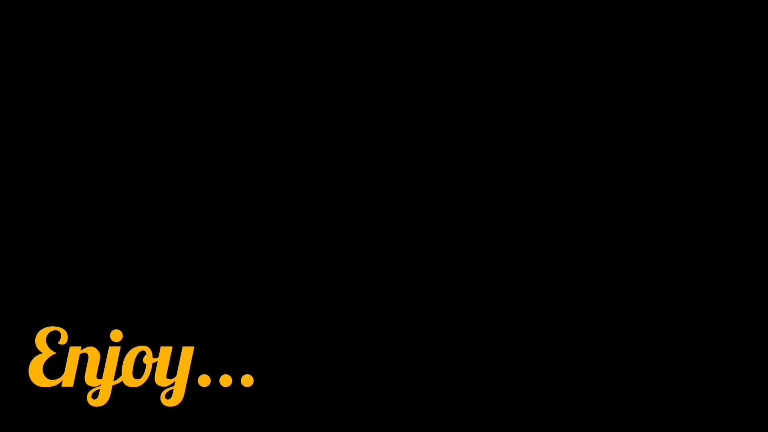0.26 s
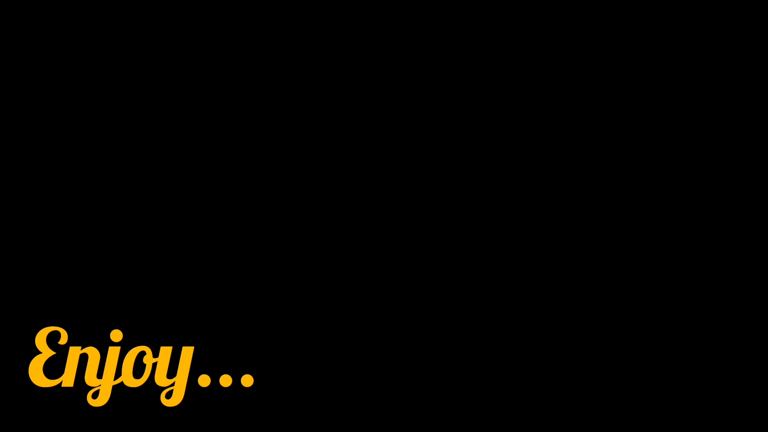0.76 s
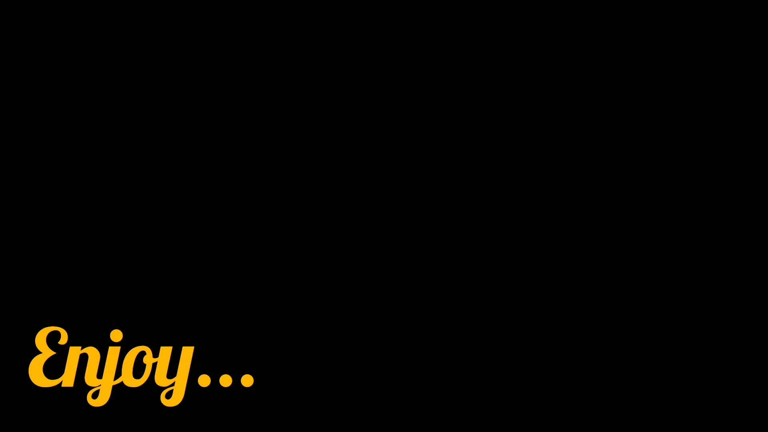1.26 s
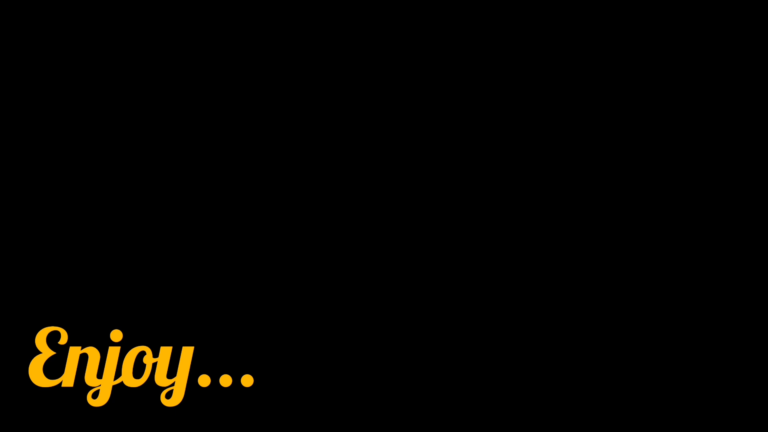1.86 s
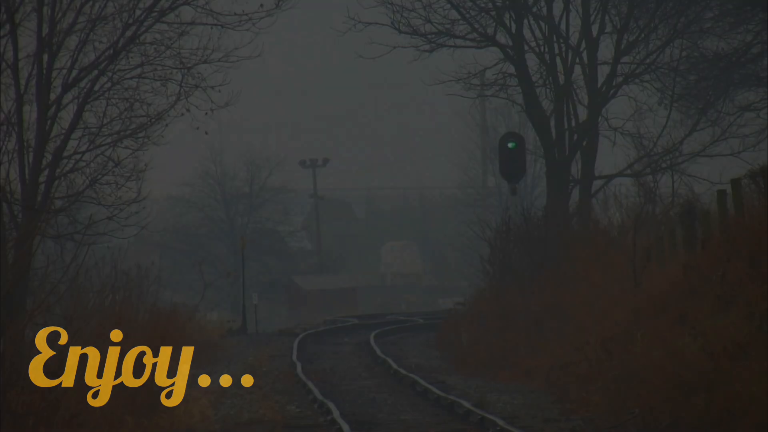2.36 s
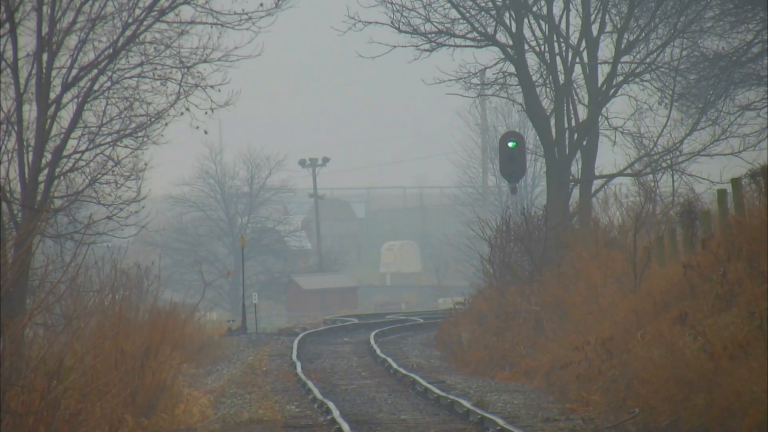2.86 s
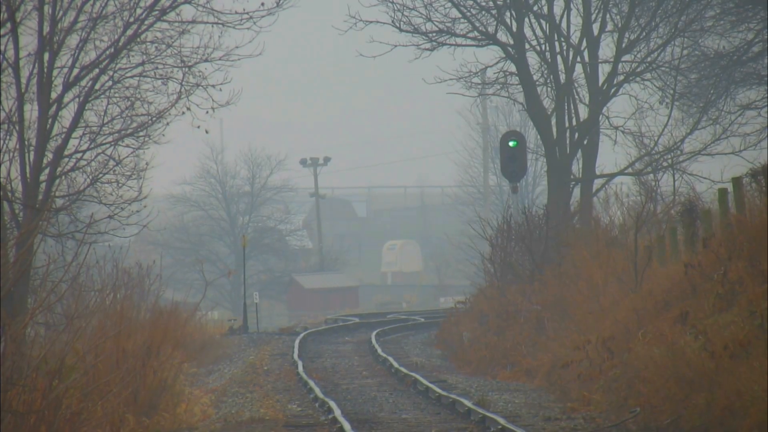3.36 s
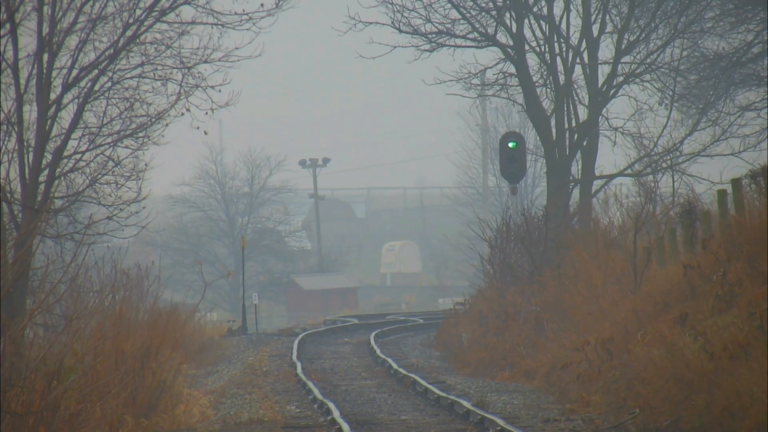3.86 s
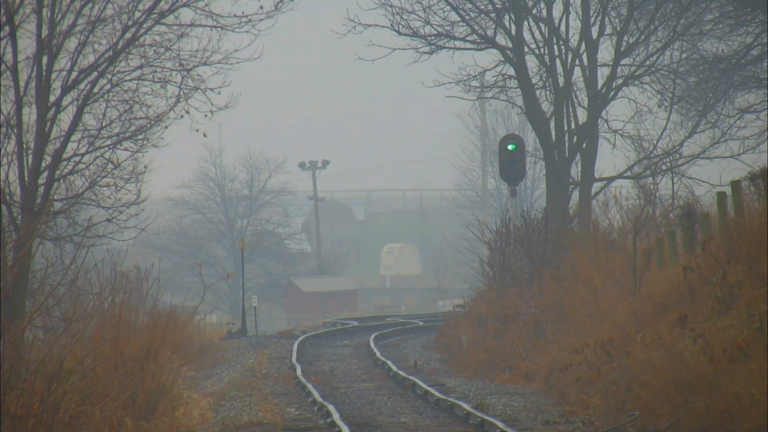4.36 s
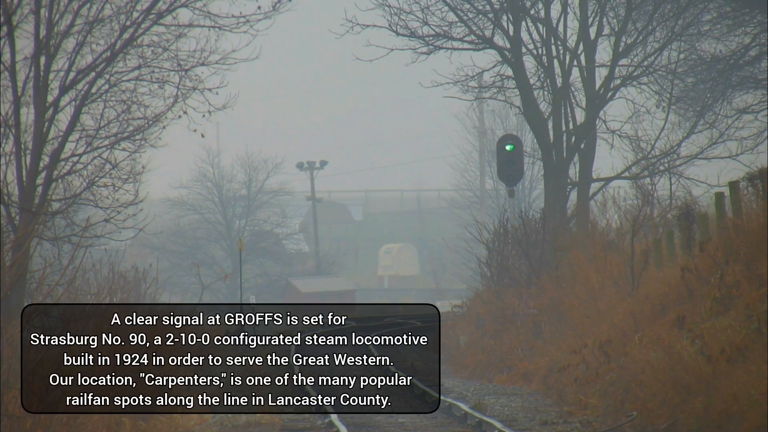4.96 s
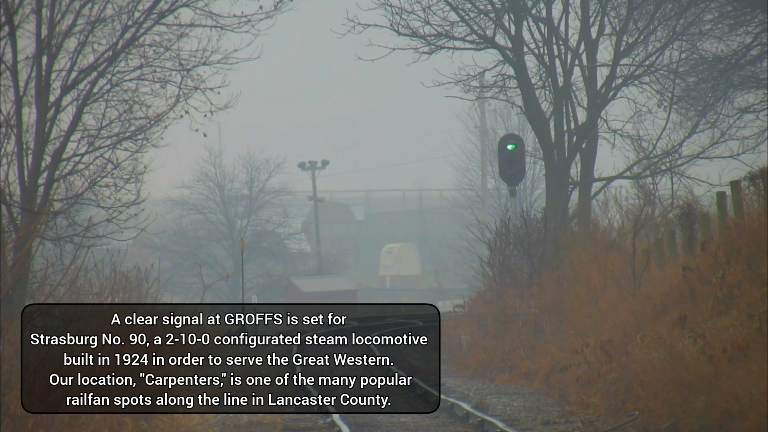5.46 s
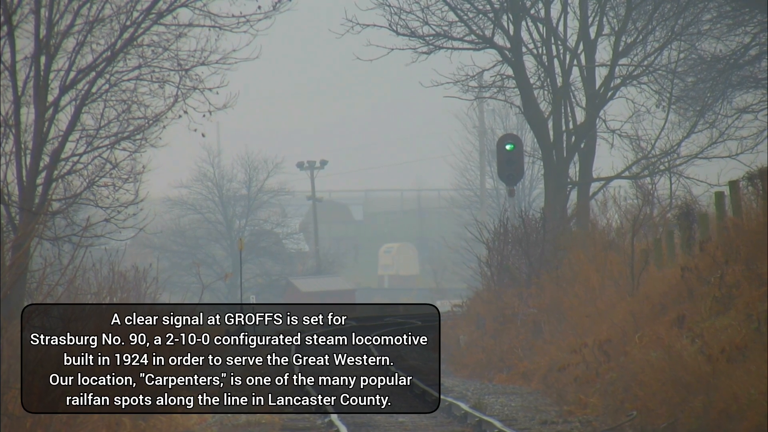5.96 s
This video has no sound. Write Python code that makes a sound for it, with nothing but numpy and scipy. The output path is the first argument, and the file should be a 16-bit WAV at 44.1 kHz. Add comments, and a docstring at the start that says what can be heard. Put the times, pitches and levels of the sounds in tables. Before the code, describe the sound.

From the start, a diesel engine hums steadily close by and slightly to the left, holding one pitch over a rush of fan and mechanical noise. Two small sharp ticks come at about 0.7 and 1.2 seconds. From around 2 seconds the engine fades, and by 3 seconds it has given way to a much quieter outdoor lane. Far traffic makes a soft rush, with a faint whine that swells near 3.5 seconds, returns more weakly near 5 and sinks in pitch. Tyre hiss rises briefly on the left at about 5 seconds. Light wind buffets the microphone, with low bumps between 3.5 and 5.7 seconds. Small birds twitter faintly from 3 seconds on, echoing slightly among the trees, with sharper high calls near 3.4 and 4.8 seconds and one thin whistle at about 6 seconds.

```python
"""Diesel engine and quiet lane

A six-cylinder diesel hums steadily close by on the left, with a tick or two: harmonics of its firing
cycle over fan and block noise. It fades out as a quiet lane fades in: far traffic with a sinking
whine, light wind buffeting the microphones, and small birds whose whistles echo among bare trees."""
import sys
import numpy as np
from scipy import signal
from scipy.fft import rfft, irfft, next_fast_len
from scipy.io import wavfile
from scipy.ndimage import uniform_filter1d, map_coordinates

SR = 44100
rng = np.random.default_rng(int(sys.argv[2]) if len(sys.argv) > 2 else 0)


def file_out(sig):
    """Save sig as 16-bit WAV at sys.argv[1]."""
    # one column per channel
    cols = np.atleast_2d(sig).T
    # limit, then scale
    lim = np.clip(cols, -1, 1)
    pcm = np.round(lim * 32767).astype(np.int16)
    wavfile.write(sys.argv[1], SR, pcm)


N = 274302
TIME = np.arange(N) / SR

# Levels are relative. Firing rate of the engine: t/s, f/Hz
FIRING_RATE = [(0.1, 106.8), (2.5, 106)]
# Exhaust harmonics: multiple of the six-firing cycle, level/dB
EXHAUST_ORDERS = [(2, -54), (3, -46), (4, -46.5), (5, -47), (6, -24), (7, -40), (8, -39), (9, -52),
                  (10, -49), (11, -56.5), (12, -44.5), (13, -67), (14, -72)]
# Panel resonances of the casing: f/Hz, width/Hz, level/dB re the roar
PANEL_MODES = [(1302, 57, 3), (1577, 74, 5), (5000, 330, -21), (5960, 150, -3.5)]
# Noise spectral densities: f/Hz, level/dB
ROAR_SPECTRUM = [(20, -28), (40, 0), (75, 1.5), (130, 0), (190, -3), (260, -5.5), (340, -10), (520, -10.5),
                 (950, -10), (1150, -16.5), (2000, -16.5), (2600, -19.5), (5000, -25), (7000, -29),
                 (11000, -33), (15700, -45)]
ROAD_SPECTRUM = [(150, -37), (250, -13.5), (282, -7.5), (353, -2.5), (508, -7), (614, -1.5), (1010, -4),
                 (1250, -4.5), (1890, -15), (2450, -17), (7660, -27.5), (12700, -32), (15600, -39)]
TYRE_SPECTRUM = [(500, -42), (900, -1), (1300, 3.5), (1800, -5.5), (2500, -12), (4000, -34.5)]
WIND_SPECTRUM = [(12, -28), (20, -0.5), (65, -2.5), (177, -3), (235, -7), (280, -23), (330, -10.5),
                 (430, -45.5), (730, -120)]
# Stereo images: f/Hz, coherence, left minus right level/dB, left phase lead/rad
ENGINE_IMAGE = [(30, .95, -1, 0.22), (100, 1, -1.5, 0.5), (250, 0.96, 0.5, 0.92), (514, 0.95, 4.5, 1.33),
                (950, 0.8, 4.5, 1.69), (1980, 0.66, 5, 3.07), (2980, 0.82, 5, 4.15), (4570, 0.12, 10, 6.2),
                (6060, 0.42, 10, 8.8), (8300, 1, 7, 10.7), (11200, 0.47, 8.5, 10.66),
                (15000, 0.61, 10.5, 14)]
ROAD_IMAGE = [(250, 0.15, 2, 0), (504, 0.13, -1, 1), (990, 0.6, 3, 2.5), (1250, 0.86, 3, 2),
              (1620, 0.6, 6, 3), (2000, 0.34, 0.5, 3), (3000, 0.08, 0.5, 5), (15000, 0.058, -1.5, 5)]
WIND_IMAGE = [(30, 0.14, 0, 0), (90, 0.0016, 1.2, 0.027), (166, 0.51, 0, 0.0088), (255, 0.26, 0, 0)]
TYRE_IMAGE = [(1000, 0.68, 10.0, 2.44), (2500, 0.5, 6.7, 3.35)]
# Ticks: t/s, level/dB, low f/Hz, high f/Hz, T60/s, body level/dB, left minus right level/dB
TICK_EVENTS = [(.664, -25.5, 4600, 6800, .008, -20, 5.5), (1.1712, -15, 4000, 11000, .005, -2, -4),
               (5.115, -55, 1500, 2500, .02, 0, 5), (5.217, -54, 7000, 14000, .006, -30, 6)]
# Modes of a tick's body: f/Hz, level/dB, T60/s
TICK_MODES = [(1600, 1, .02), (2900, 1, .006), (4000, 3, .005), (5000, 2, .005)]
# Far vehicles swelling the tyre hiss: centre t/s, half length/s, rise/dB
VEHICLE_PASSES = [(3.58, .15, 1), (5.08, .3, 6.5)]
# Fundamental of the drive whine: t/s, f/Hz
WHINE_GLIDE = [(2.6, 320), (4.05, 316), (6.22, 294.5)]
# Its harmonics: multiple, level/dB
WHINE_HARMONICS = [(2, 4.5), (3, 2), (4, -4)]
# Plateaus of its swells: start t/s, end t/s, level/dB
WHINE_PLATEAUS = [(3.4, 4.03, -56.5), (4.8, 5.0, -63)]
# Strong gust bumps: centre t/s, level/dB, f/Hz
GUST_BUMPS = [(3.547, -21, 97), (3.768, -21, 102), (4.538, -23, 70), (4.745, -22, 74.6), (4.832, -21, 113),
              (4.931, -24, 86), (4.973, -24.5, 80), (5.452, -24, 75), (5.479, -24, 64.7),
              (5.525, -18.5, 131)]
# Short twittered slurs: t/s, length/s, start f/Hz, end f/Hz
TWITTER_SLURS = [(3.008, .016, 4200, 3400), (3.058, .02, 3350, 3050), (3.086, .034, 3050, 3750),
                 (3.12, .016, 3500, 3150), (3.602, .016, 4200, 3700), (3.646, .012, 3700, 4100),
                 (3.674, .022, 4000, 3200), (3.696, .012, 3400, 3800), (3.743, .02, 3300, 3000),
                 (4.058, .018, 4100, 3600), (4.117, .018, 3550, 3950), (4.135, .012, 3500, 3100),
                 (4.657, .02, 3200, 3500), (4.908, .016, 3300, 3550), (5.01, .016, 3300, 3550),
                 (5.368, .026, 3100, 3950), (5.394, .016, 3550, 3200)]
# Falling chirps: t/s, start f/Hz, middle level/dB
FALLING_CHIRPS = [(4.135, 7900, -68), (4.24, 7650, -66)]
# Sharp up-and-down calls: t/s, top f/Hz, level/dB
ARCHED_CALLS = [(3.426, 7600, -51), (4.826, 7850, -52.5)]

ENGINE_GAIN_DB, HUM_DROP_S, HUM_DROP_DB = 1.5, (2.75, 2.8), -4.5
FADE_START_S, ENGINE_GONE_S, LANE_FULL_S = 1.904, 2.93, 2.96
ROAD_DB, HISS_DB, BREEZE_DB = -49, -55.5, -43.5
WHINE_FLOOR_DB, WHINE_RISE_DB_PER_S, WHINE_FALL_DB_PER_S = -70, 23, 72
SMALL_BUMPS_S, SMALL_BUMP_DB, SMALL_BUMP_HZ = (4.3, 5.65), -29.5, 78
ARCH_S, ARCH_FOOT_HZ = .037, 4300
BAND_LIMIT_HZ = 15725


def engine():
    """Periodic excitation: exhaust and valves share one cycle of six firings."""
    firing_hz = curve(FIRING_RATE) + .3 * wobble(4)
    cycle = 2 * np.pi * np.cumsum(firing_hz) / 6 / SR
    hum_gain = amp(np.interp(TIME, HUM_DROP_S, [0, HUM_DROP_DB]))  # the hum steps down late in the fade
    return hum_gain * exhaust(cycle) + block_noise(cycle)


def exhaust(cycle):
    """Fourier series: uneven cylinders give lines at multiples of a sixth of the firing rate."""
    note = np.zeros(N)
    for order, db in EXHAUST_ORDERS:
        drift = .5 if order % 6 == 0 else 2.5  # the unevenness of the burns varies between cycles
        lag = .05 * (order - 6) ** 2  # the pipe smears each pulse in time
        peak = np.sqrt(2) * amp(db + drift * wobble(4.53))
        note += peak * np.cos(order * cycle - lag + 0.6 * drift * wobble(4.1))
    return filtered(note, placed(ENGINE_IMAGE))


def block_noise(cycle):
    """Resonance and modulation: panels colour the fan and block roar; valve clatter pulses its treble."""
    panels = lambda hz: 1 + sum(amp(db) / (1 + (2 * (hz - centre) / width) ** 2)
                                for centre, width, db in PANEL_MODES)
    roar = rush(ROAR_SPECTRUM, ENGINE_IMAGE, patchy_db=0.9, colour=panels)
    treble = filtered(roar, lambda hz: 1 / (1 + (7000 / (hz + 1)) ** 4))
    valve = lambda lag: np.exp(4.3 * (np.cos(cycle - lag) - 1))  # a brief burst once a cycle
    clatter = 0.7 * amp(2.2 * wobble(12)) * valve(4.4) + 0.25 * amp(2.6 * wobble(12)) * valve(7.3)
    clatter += 0.097 * wobble(29.6) - .2
    return amp(-31.5) * (roar + treble * clatter)


def ticks():
    """Damped transients: a crack of band noise, and body modes that build up within a millisecond."""
    out, t = np.zeros((2, N)), np.arange(SR // 20) / SR
    for s, db, low_hz, high_hz, t60, body_db, pan_db in TICK_EVENTS:
        band = signal.butter(2, [low_hz, high_hz], "band", fs=SR)
        crack = amp(-60 * t / t60) * unit(signal.lfilter(*band, rng.standard_normal((2, len(t)))))
        modes = sum(amp(body_db + level + rng.normal(0, 2) - 60 * t / ring) * np.sin(2 * np.pi * hz * t)
                    for hz, level, ring in TICK_MODES)
        body = (1 - np.exp(-t / .0004)) * modes
        add(out, s, amp(db) * (crack + body) * sides(pan_db)[:, None])
    return out


def drive_whine():
    """Harmonics on a gliding fundamental: a far drive swells twice and sinks in pitch as it recedes."""
    swells = [db - WHINE_RISE_DB_PER_S * np.maximum(start - TIME, 0)
              - WHINE_FALL_DB_PER_S * np.maximum(TIME - end, 0) for start, end, db in WHINE_PLATEAUS]
    level = np.maximum(np.max(swells, axis=0), WHINE_FLOOR_DB)
    phase = 2 * np.pi * np.cumsum(curve(WHINE_GLIDE) + 2.58 * wobble(15)) / SR
    whine = sum(amp(level + db + 2.4 * wobble(7.7)) * np.sin(k * phase) for k, db in WHINE_HARMONICS)
    return filtered(whine, placed(ROAD_IMAGE))


def traffic():
    """Broadband rolling noise: a far road's rush, and tyre hiss on the left that swells at each pass."""
    road = amp(ROAD_DB + 0.17 * wobble(3.68)) * rush(ROAD_SPECTRUM, ROAD_IMAGE, patchy_db=1.03)
    rise_db = sum(db * np.exp(-((TIME - s) / half) ** 2) for s, half, db in VEHICLE_PASSES)
    return road + amp(HISS_DB + rise_db) * rush(TYRE_SPECTRUM, TYRE_IMAGE, patchy_db=1.5)


def wind():
    """Pressure fluctuations: low buffeting, and bumps that push the left capsule and pull the right."""
    lumps = amp(1.6 * np.array([wobble(11), wobble(5.9)]))
    out = amp(BREEZE_DB) * unit(lumps * rush(WIND_SPECTRUM, WIND_IMAGE, patchy_db=-0.3))
    first, last = SMALL_BUMPS_S
    small = [(first + (last - first) * when, SMALL_BUMP_DB + 6 * (force - .5),
              SMALL_BUMP_HZ * 2 ** (pitch - .5)) for when, force, pitch in rng.random((11, 3))]
    for s, db, hz in GUST_BUMPS + small:
        half = int(1.5 * SR / hz)
        periods = np.arange(-half, half) * hz / SR
        pulse = np.cos(2 * np.pi * periods + rng.uniform(0, 2 * np.pi)) * np.exp(-(periods / 0.5) ** 2)
        add(out, s - half / SR, amp(db) * pulse * [[1], [-.48]])
    return out


def bird_slurs():
    """Frequency modulation: each whistled note is a linear glide with a slight quaver."""
    out, quaver = np.zeros((2, N)), 1 + .012 * wobble(90)

    def slur(s, length_s, start_hz, end_hz, db, pan_db=0, swell_db=0):
        u = np.linspace(-1, 1, int(length_s * SR))
        hz = np.linspace(start_hz, end_hz, len(u)) * quaver[round(s * SR):][:len(u)]
        envelope = amp(db + swell_db * u / 2) * (1 - u ** 2) ** .4
        add(out, s, envelope * np.sin(2 * np.pi * np.cumsum(hz) / SR) * sides(pan_db)[:, None])

    for row in TWITTER_SLURS:
        slur(*row, db=-63, pan_db=3)
    for s, hz, db in FALLING_CHIRPS:
        slur(s, length_s=.056, start_hz=hz, end_hz=hz - 1850, db=db, swell_db=8)
    slur(5.88, length_s=.255, start_hz=5520, end_hz=5150, db=-72)  # one long, thin note
    return out


def bird_arches():
    """Period doubling: a call rises and falls in pitch, with a subharmonic at full breath."""
    out, u = np.zeros((2, N)), np.linspace(-1, 1, int(ARCH_S * SR))
    for s, top_hz, db in ARCHED_CALLS:
        phase = 2 * np.pi * np.cumsum(top_hz + (ARCH_FOOT_HZ - top_hz) * abs(u) ** 3.2) / SR
        subharmonic = amp(-8) * (1 - u ** 2) ** 3 * np.sin(phase / 2)
        add(out, s, amp(db) * (1 - u ** 2) ** .3 * (np.sin(phase) + subharmonic) * np.ones((2, 1)))
    return out


def birds():
    """Scattering: the calls flutter on their way through the twigs, and the trees return echoes."""
    calls = bird_slurs() + bird_arches()
    calls *= amp(2.4 * wobble(90) + 2.4 * np.array([wobble(120), wobble(120)]))
    t = np.arange(SR // 2) / SR
    echoes = rng.standard_normal((2, len(t))) * amp(-60 * t / .15) * (t > .003)  # T60 of 0.15 s
    return calls + signal.fftconvolve(calls, echoes / np.linalg.norm(echoes[0]), axes=1)[:, :N]


def rush(spectrum, image, patchy_db, colour=lambda hz: 1):
    """Partially coherent stereo noise of rms 1, its gain patchy in time and frequency."""
    bins = signal.stft(rng.standard_normal((2, N + 512)), nperseg=512)[2]
    patches = uniform_filter1d(rng.standard_normal(bins.shape[1:]), size=6, axis=0)
    patches = unit(uniform_filter1d(patches, size=12, axis=1))
    pair = signal.istft(bins * amp(patchy_db * patches), nperseg=512)[1][:, :N]
    gain = lambda hz: amp(along(spectrum, hz)) * colour(hz)
    angle = lambda hz: np.arccos(np.clip(along(image, hz), -1, 1)) / 2  # coherence sets side against mid
    mid, side = filtered(pair, lambda hz: gain(hz) * [np.cos(angle(hz)), np.sin(angle(hz))])
    return unit(filtered(np.array([mid + side, mid - side]), placed(image)))


def placed(image):
    """Stereo response: a level difference, and the phase lead of the nearer microphone."""
    return lambda hz: (sides(along(image, hz, column=2))
                       * np.exp(.5j * along(image, hz, column=3) * np.array([[1], [-1]])))


def sides(db):
    """Left and right gains for a level difference."""
    return amp(np.array([db / 2, -db / 2]))


def filtered(x, response):
    """Linear filtering: the spectrum of x times a complex response."""
    size = next_fast_len(N + 8192)
    return irfft(rfft(x, size) * response(np.fft.rfftfreq(size, 1 / SR)), size)[..., :N]


def along(rows, hz, column=1):
    """A table column interpolated on a log frequency axis."""
    columns = np.transpose(rows)
    return np.interp(np.log(hz + 1), np.log(columns[0] + 1), columns[column])


def curve(rows):
    """Rows of (time, value) interpolated at every sample."""
    return np.interp(TIME, *np.transpose(rows))


def wobble(rate):
    """A smooth random curve, rate knots a second."""
    return map_coordinates(rng.standard_normal(int(N * rate / SR) + 4), [TIME * rate])


def add(track, s, sound):
    """Superposes a stereo sound from time s."""
    part = track[:, round(s * SR):round(s * SR) + sound.shape[1]]
    part += sound[:, :part.shape[1]]


def amp(db):
    """Amplitude ratio of a level in dB."""
    return 10 ** (np.asarray(db) / 20)


def unit(x):
    """Scaled to rms 1."""
    return x / np.sqrt(np.mean(x ** 2) + 1e-20)


def scene():
    """Superposition: the engine fades linearly into the lane; the ticks bypass the fade."""
    ramp = lambda end_s: np.clip((TIME - FADE_START_S) / (end_s - FADE_START_S), 0, 1)
    near = amp(ENGINE_GAIN_DB) * (1 - ramp(ENGINE_GONE_S)) * engine() + ticks()
    lane = drive_whine() + traffic() + wind() + birds()
    return near + ramp(LANE_FULL_S) * lane


def record(dry):
    """An ideal low-pass filter: nothing passes above the band limit."""
    return filtered(dry, lambda hz: hz < BAND_LIMIT_HZ)


dry = scene()
out = record(dry)
file_out(out)
```